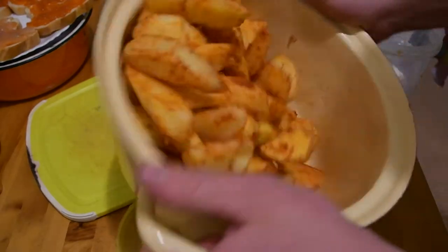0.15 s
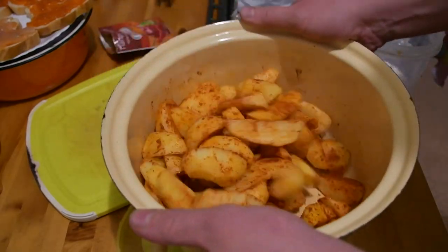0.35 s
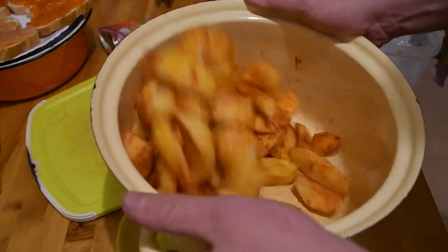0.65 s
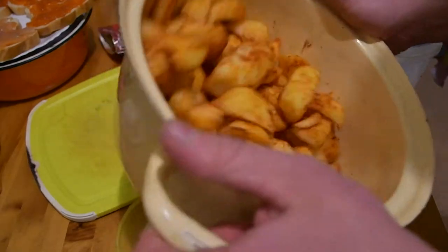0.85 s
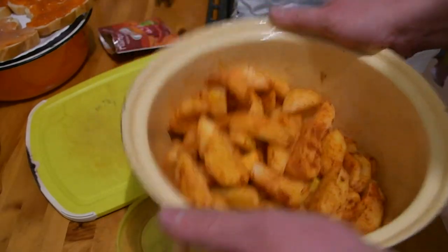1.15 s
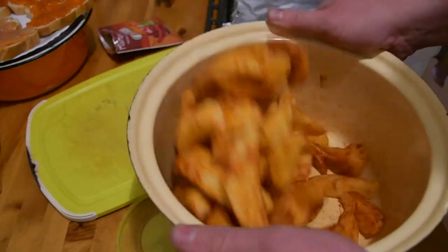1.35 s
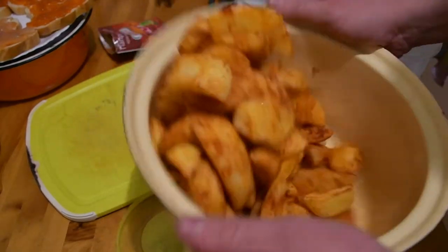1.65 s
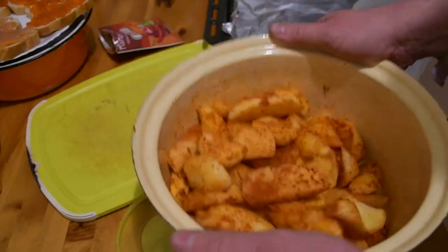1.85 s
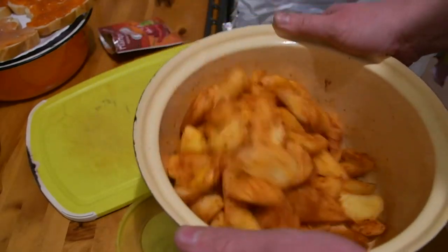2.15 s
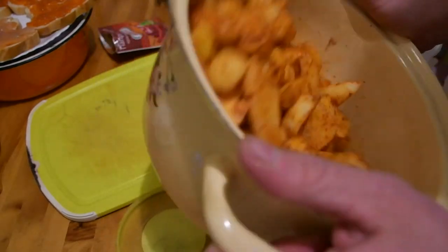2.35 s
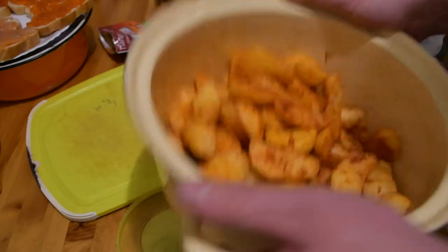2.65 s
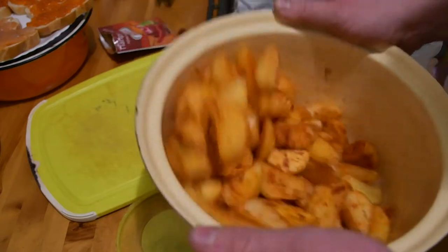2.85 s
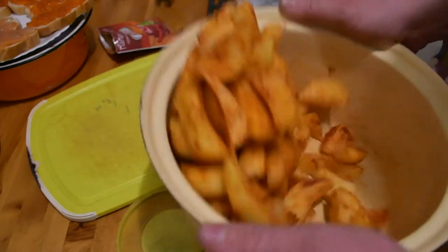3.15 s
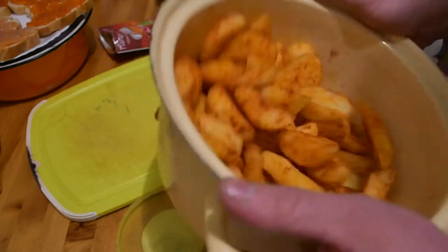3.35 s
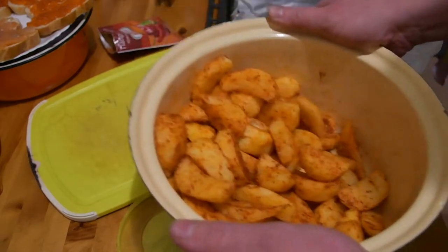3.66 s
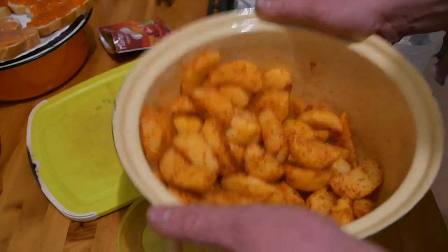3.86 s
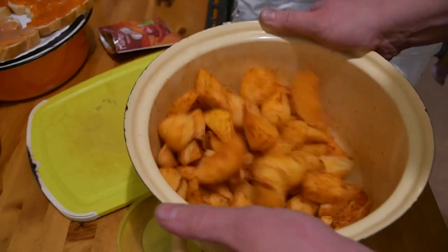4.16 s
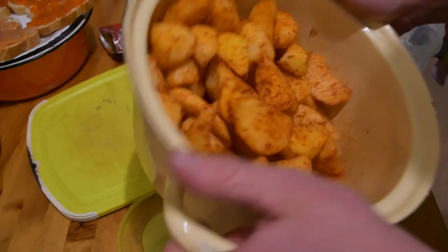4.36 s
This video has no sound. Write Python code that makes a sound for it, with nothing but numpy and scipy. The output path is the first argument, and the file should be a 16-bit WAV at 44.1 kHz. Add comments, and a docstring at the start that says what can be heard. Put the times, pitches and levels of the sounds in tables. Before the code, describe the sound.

A close stereo pickup in a still kitchen: a heap of wet wedges scrapes along the smooth pot wall, drops back with muffled clatter and short damped rings, then nearly hushes before the next toss. The rhythm is regular but hand-made, some landings much harder, with small slapping smacks, slight echo and quiet low air.

```python
"""In a quiet kitchen, oiled raw potato wedges are tossed in a glazed pot held in two hands, close to a stereo microphone.
Each toss: the heap slides hissing along the glaze, then wedges land and knock the hand-damped pot into short rings.
The hiss is shaped noise with crackles; landings, small bumps and rubbing shake a set of decaying modes.
Wet faces smack the glaze in bursts of noise. A faint echo of the kitchen and its still air lie around it all."""
import sys
import numpy as np
from scipy import signal
from scipy.io import wavfile
from scipy.ndimage import uniform_filter1d

SR = 44100
rng = np.random.default_rng(int(sys.argv[2]) if len(sys.argv) > 2 else 0)


def nominal_scale(level):
    """Amplitude ratio for a level in decibels (scalar or array-like)."""
    x = np.asarray(level, float) / 20
    return 10 ** x


def file_out(sig):
    """Save sig as 16-bit WAV at sys.argv[1]."""
    # one column per channel
    cols = np.atleast_2d(sig).T
    # limit, then scale
    lim = np.clip(cols, -1, 1)
    pcm = np.round(lim * 32767).astype(np.int16)
    wavfile.write(sys.argv[1], SR, pcm)


N = 198711  # length in samples

# Colour of noise made on the glaze: f/Hz, level/dB (per Hz, relative)
GLAZE_COLOUR = [(760, -52), (1300, -39), (1620, -10), (2000, -9.5), (2390, -8), (3910, -8), (5360, -8),
                (7730, -6), (10700, -6), (15900, -18)]


def evened(x):
    """Scales to rms 1."""
    return x / np.sqrt(np.mean(x ** 2) + 1e-20)


def read(points, hz):
    """Reads a table of values over frequency, with straight lines on a log-frequency axis."""
    f, value = np.transpose(points)
    return np.interp(np.log(hz + 1), np.log(f + 1), value)


def spread(mid, side, hz):
    """Left and right from the part both microphone ports share and the part they do not."""
    # how much louder the left port is than the right: f/Hz, level/dB
    left_over_right = [(60, 0.0), (150, 0.0), (380, -0.5), (950, -1.0), (2380, -3.5), (5980, -2.5),
                       (15000, -7.5)]
    # the unshared part against the shared one: f/Hz, level/dB
    side_share = [(60, -24.5), (150, -39), (380, -40), (950, -10.5), (2380, -0.5), (5980, -0.5),
                  (15000, -2.5)]
    half = nominal_scale(read(left_over_right, hz) / 2)
    side = side * nominal_scale(read(side_share, hz))
    return np.array([(mid + side) * half, (mid - side) / half])


def noise_pair(points, patchy_db, size):
    """Random short-time spectra for two microphone ports, alike in the bass, with drifting patches."""
    frames = 4 * N // size + 5
    hz = np.fft.rfftfreq(size, 1 / SR)[:, None]
    a, b, c, d, patches = rng.standard_normal((frames, len(hz), 5)).T
    patches = uniform_filter1d(patches, size=5, axis=0)  # smooth over frequency
    patches = evened(uniform_filter1d(patches, size=12, axis=1))  # smooth over time
    colour = nominal_scale(read(points, hz) + patchy_db * patches)
    spectra = spread(a + 1j * b, c + 1j * d, hz) * colour
    noise = signal.istft(spectra, nperseg=size, noverlap=3 * size // 4)[1]
    return evened(noise[:, :N])


def level(start, end, first_db, last_db, rise, fall):
    """Level in dB for every sample: each motion sets in steeply, runs from first to last, dies away; powers add."""
    t = np.arange(N)[:, None] / SR
    progress = np.clip((t - start) / np.maximum(end - start, 1e-3), 0, 1)
    db = first_db + (last_db - first_db) * progress
    db = db - rise * np.maximum(start - t, 0) - fall * np.maximum(t - end, 0)
    return 10 * np.log10((nominal_scale(db) ** 2).sum(1) + 1e-20)


def flicker(per_s, count=1):
    """Slow random wandering: new normal draws per_s times a second, joined by straight lines."""
    steps = rng.standard_normal((count, 1000))
    return [np.interp(np.arange(N) / SR * per_s, np.arange(1000), row) for row in steps]


def still_air():
    """The still air of the room: quiet, steady noise, strongest in the bass."""
    # colour of the air noise: f/Hz, level/dB (per Hz, relative)
    air_colour = [(24, -23), (40, -21), (255, -3), (478, -12), (629, -9), (1090, -16), (1800, -22.5),
                  (5160, -28), (15900, -38)]
    return nominal_scale(-49.5) * noise_pair(air_colour, 0.49, size=2048)


def sliding():
    """How fast the heap slides, in dB."""
    # strokes of the heap along the wall:
    # breaks loose t/s, hand stops pushing t/s, first level/dB, last level/dB
    strokes = [(0.0, -0.005, -18, -40), (0.109, 0.257, -37, -31), (0.4, 0.43, -38, -41),
               (0.524, 0.64, -36.5, -25.5), (0.857, 0.993, -31.5, -30), (1.236, 1.442, -33, -31),
               (1.584, 1.715, -36.5, -28.5), (1.987, 1.97, -27, -26.5), (2.082, 2.091, -27, -24),
               (2.356, 2.398, -34, -34.5), (2.456, 2.522, -28, -29.5), (2.719, 2.75, -40, -34.5),
               (2.807, 2.855, -34.5, -27.5), (3.067, 3.265, -36.5, -30.5), (3.393, 3.437, -43, -38),
               (3.478, 3.482, -22, -30.5), (3.827, 3.91, -52, -62), (3.927, 3.988, -41, -26),
               (4.017, 4.168, -32.5, -36.5), (4.342, 4.46, -44, -24), (4.447, 4.525, -47, -39)]
    loose_db_per_s, rest_db_per_s = 896, 133.5  # how fast a stroke breaks loose and comes to rest
    return level(*np.transpose(strokes), loose_db_per_s, rest_db_per_s)


def slide(grains_per_s=300, grain_db=9.0, grain_share=0.38, grain_s=0.0017, catch_db=3.0):
    """Oily hiss of the heap dragged over the glaze; it catches and slips, studded with sticky crackles."""
    grain_size = nominal_scale(grain_db * np.minimum(rng.exponential(1, N), 3))
    grains = (rng.random(N) < grains_per_s / SR) * grain_size
    # each grain dies away over grain_s
    crackle = evened(signal.lfilter([1], [1, -np.exp(-1 / (grain_s * SR))], grains))
    drag = nominal_scale(sliding() + catch_db * flicker(45)[0])
    drag = drag * (1 - grain_share + grain_share * crackle)
    return drag * noise_pair(GLAZE_COLOUR, 2.2, size=256)


def tumbling():
    """How hard the heap tumbles, in dB."""
    # the heap coming down, in one or more falls a toss, and small tumbles between:
    # first wedges fall t/s, bulk is down t/s, level then/dB, settling speed/(dB per s)
    tumbles = [(0.0, 0.007, -34, 238), (0.173, 0.233, -16.5, 177), (0.403, 0.409, -25, 252),
               (0.553, 0.647, -16, 131), (0.905, 0.976, -19.5, 176), (1.281, 1.346, -20, 113),
               (1.64, 1.676, -19.5, 179), (1.998, 1.99, -25, 129), (2.036, 2.052, -15.5, 116),
               (2.432, 2.503, -14, 159), (2.722, 2.763, -29.5, 150), (2.82, 2.85, -15, 209),
               (3.137, 3.215, -22, 110), (3.439, 3.453, -21, 137), (3.994, 4.018, -11.5, 154),
               (4.4, 4.418, -11, 76)]
    build_db, rise_db_per_s = 5.5, 445  # the first wedges are build_db quieter than the bulk
    start, down, db, settle = np.transpose(tumbles)
    return level(start, down, db - build_db, db, rise_db_per_s, settle)


def pot(place_db=4.0, bumps_per_s=220, bump_db=-13.0, spread_db=6.0, rub_db=-32.5, contact_s=0.00097, drift=0.01,
        mute_db=3.5, corner_db=-1.5, tip_s=0.003):
    """Landings, a rain of small bumps and the rub of the heap all shake the same modes."""
    # what the pot rings with: f/Hz, level/dB, time to fall by 60 dB t/s (held to 0.2 s at most below)
    modes = [(129, -24.5, 0.068), (174, -19, 0.058), (260.7, -13.5, 0.037), (316, -17.5, 0.12),
             (398, -14, 0.049), (556.8, -13, 0.096), (614, -8.5, 0.026), (648.5, -8, 0.028),
             (771, -6.5, 0.056), (753, -29.5, 0.19), (920, -20.5, 0.035), (998.5, -23, 0.21),
             (1045.7, -13, 0.11), (1105, -5, 0.061), (1127.5, -11.5, 0.072), (1626, -16.5, 0.1),
             (1667, -10, 0.043), (2215, -16.5, 0.061), (2405, -15, 0.048), (3042, -16, 0.026),
             (3425, -18.5, 0.056), (4150, -28.5, 0.088), (4530, -19.5, 0.038), (5400, -16, 0.024),
             (5820, -19, 0.023), (6130, -25, 0.036), (7600, -22, 0.035), (7160, -25.5, 0.045),
             (8730, -24.5, 0.023), (9400, -23.5, 0.019), (10240, -26, 0.015)]
    # wedges landing: t/s, force level/dB, extra level for low rings/dB, extra level for high rings/dB
    knocks = [(0.178, -21, -3, 3.5), (0.199, -11.5, -10, 1.5), (0.246, -18, 2.5, -1),
              (0.393, -21, -3.5, 3.5), (0.527, -43, -1, 11), (0.546, -25, -22, 1), (0.586, -9, 2.5, -2.5),
              (0.597, -13, 3.5, 2), (0.61, -6.5, -2, -1), (0.636, -1.5, -14.5, -11),
              (0.665, -23, -10, -16.5), (0.702, -13, 1.5, -10), (0.768, -23, -15, -6), (0.873, -39, 13, 6),
              (0.936, -16, 3, -8), (0.945, -15, -6, 2.5), (0.964, -18, -3, 4), (0.954, -15, -14, -4),
              (0.988, -15.5, 5, 3), (1.045, -38, 16.5, -17), (1.312, -11.5, 2, -4.5),
              (1.327, -19.5, -3, 0.5), (1.351, -23, 4, 2), (1.366, -16.5, 1, 0), (1.486, -26.5, 2.5, 8.5),
              (1.649, -37, 17.5, -5.5), (1.684, -17, -2, 2.5), (1.711, -27, 6, 1), (1.769, -35, -8, 16.5),
              (1.985, -29, -1, 5.5), (1.999, -23, -10, 9.5), (2.049, -8.5, -16, -8), (2.072, -7.5, 6, -11),
              (2.081, -3.5, -6.5, -9), (2.425, -26, -21, -6.5), (2.45, -17.5, 9, -6.5),
              (2.484, -17, 4, 7.5), (2.5, -10.5, 2, -3), (2.733, -34.5, 3, -2), (2.798, -30, 9.5, 11),
              (2.817, -26, 11, 7), (2.839, -16, 0.5, -25), (2.859, -12, -0.5, -4), (3.137, -35, 8, 4),
              (3.167, -10, -4.5, -2.5), (3.19, -25, 9.5, 5.5), (3.301, -35.5, 7, 12), (3.456, -16.5, 3, -9),
              (3.465, -16, 6.5, 4.5), (3.504, -12, -9.5, -6), (3.965, -17.5, 2.5, -17),
              (4.008, -26.5, 7, 3), (4.045, -19, 0, 5.5), (4.359, -34, 10.5, 9), (4.375, -8.5, -13, -5),
              (4.395, -2, -33, -8.5), (4.427, -5, 0.5, -10), (4.447, -9, 1, -3)]
    s, peak_db, low_db, hard_db = np.transpose(knocks)
    # where a wedge lands sets how much each mode gets
    place = rng.standard_normal((len(s), len(modes), 3))
    # a corner touches first, then the face about tip_s later
    corner_at = np.round(s * SR).astype(int)
    tip = tip_s * SR * rng.uniform(0.5997, 1.4, len(s))
    face_at = corner_at + np.round(tip).astype(int)

    bump_at = np.flatnonzero(rng.random(N) < bumps_per_s / SR)
    luck = np.minimum(rng.exponential(1, len(bump_at)), 2.5)
    bump_size = nominal_scale(tumbling()[bump_at] + bump_db + spread_db * luck)

    # the shifting load and grip detune the pot: drift is the rms share by which pitch wanders
    t = np.arange(N) / SR
    load = evened(sum(np.sin(2 * np.pi * (f * t + rng.random())) / np.sqrt(f) for f in np.geomspace(1, 15, num=12)))
    clock = np.cumsum(1 + drift * load) / SR

    # each mode has a twin turned around the round wall, which the two ports hear in opposite phase
    rub = nominal_scale(sliding() + rub_db) * rng.standard_normal((2, N))
    muting = flicker(14, count=len(modes))
    soft = np.exp(-1 / (contact_s * SR))  # flesh is soft: a push, not a spike
    out = np.zeros((2, N))
    for k, (hz, db, t60) in enumerate(modes):
        # rubbing favours high modes; wedges lying on the wall mute now one mode, now another
        force = rub * nominal_scale(8.0 * np.log2(hz / 1000) + mute_db * muting[k])
        dull_db = -4.0 * max(np.log2(hz / 2500), 0)  # soft blows hardly reach the top modes
        force[:, bump_at] += nominal_scale(dull_db) * bump_size * rng.standard_normal((2, len(bump_at)))

        colour_db = low_db if hz < 900 else np.clip(np.log2(hz / 1200) * 2.5, 0, 1) * hard_db
        colour_db = colour_db - 8.9 * (hz < 450)  # holds back the hollow thud of the whole pot
        blow = nominal_scale(peak_db + colour_db + dull_db + place_db * place[:, k, 0])
        blow = np.array([blow, blow * place[:, k, 1]])
        force[:, corner_at] += nominal_scale(corner_db) * blow
        force[:, face_at] += blow * np.sign(place[:, k, 2])

        # shift the force down to 0 Hz, let it ring there, then shift it back to the drifting pitch
        turn = np.exp(2j * np.pi * hz * clock)
        ring = nominal_scale(-60 / (np.clip(t60, .01, .2) * SR))
        swing = signal.lfilter([1 - soft], np.poly([soft, ring]), force * turn.conj())
        out += spread(*(nominal_scale(db) * (swing * turn).imag), hz)
    return out


def smacks(fast_s=0.0049, slow_s=0.02, core_db=-4.5, core_width=0.074, tick_db=6.0, tick_s=0.00043):
    """Each smack is a tick, a short wide puff and a longer, narrower hiss where the oil film tears."""
    # wet faces slapping the glaze or peeling off it: t/s, level/dB, f/Hz (middle of the narrow hiss)
    wet_faces = [(0.3936, -28, 8700), (0.4334, -52, 5820), (0.609, -30, 6200), (0.665, -34, 8500),
                 (1.4134, -50, 5180), (1.4224, -18, 8000), (1.5648, -36.5, 5600), (2.0493, -28.5, 4470),
                 (2.107, -27, 5810), (2.247, -44, 7000), (2.26, -36, 7800), (2.4523, -30.5, 5600),
                 (2.6684, -36.5, 5780), (3.029, -40.5, 5640), (3.164, -28.5, 8450), (3.3034, -30.5, 6800),
                 (3.469, -23.5, 7550), (4.242, -39, 4440), (4.428, -25, 7000), (4.4516, -24.5, 8800)]
    t = np.arange(SR // 10) / SR
    out = np.zeros((2, N + SR))
    puff = noise_pair(GLAZE_COLOUR, 1.9, size=256)
    for s, db, hz in wet_faces:
        at = round(s * SR)
        part = puff[:, at:at + len(t)]
        u = t[:part.shape[1]]
        band = signal.butter(1, [hz * (1 - core_width), hz * (1 + core_width)], "bandpass", fs=SR)
        core = nominal_scale(core_db) * evened(signal.lfilter(*band, part))
        wide = part * (np.exp(-u / fast_s) + nominal_scale(tick_db) * np.exp(-u / tick_s))
        out[:, at:at + len(u)] += nominal_scale(db) * (wide + core * np.exp(-u / slow_s))
    return out[:, :N]


def kitchen(x):
    """Echo from sparse taps of random sign, each band dying at its own speed, other taps for each side."""
    # how long the echo lasts: f/Hz, time to fall by 60 dB t/s
    echo_times = [(200, 0.34), (1000, 0.35), (4000, 0.15), (12000, 0.055)]
    taps = np.zeros((2, SR // 2))
    at = np.arange(200, SR // 2 - 20, 20)
    at = at + rng.integers(0, 20, (2, len(at)))  # one tap somewhere in every 20 samples
    np.put_along_axis(taps, at, rng.choice([-1., 1.], at.shape), 1)
    hz, t, z = signal.stft(taps, SR, nperseg=256)
    decay = nominal_scale(-60 * t / np.maximum(read(echo_times, hz), .05)[:, None])
    z = spread(*z, hz[:, None]) * decay
    tail = signal.istft(z, SR, nperseg=256)[1]
    tail = tail / np.linalg.norm(tail[1])
    return signal.fftconvolve(x.mean(0)[None], tail, axes=1)[:, :N]


def scene():
    """The pot and its load, their echo in the kitchen, and the still air of the room."""
    near = slide() + pot() + smacks()
    return near + nominal_scale(-10) * kitchen(near) + still_air()


def low_pass(x):
    """Removes everything above the highest recorded frequency."""
    return signal.sosfilt(signal.butter(12, 16090, fs=SR, output="sos"), x)


def record(dry, bass_hz=85, edge_hz=15780):
    """The microphone drops the deep bass, its left port hears one sample late, peaks stop at full scale."""
    thin = signal.lfilter(*signal.butter(N=3, Wn=bass_hz, btype="highpass", fs=SR), dry)
    left_late = np.append(0, thin[0, :-1])
    limited = np.clip([left_late, thin[1]], -1, 1)
    edge = signal.firwin(numtaps=401, cutoff=edge_hz, fs=SR)  # the treble ends here
    mix = signal.oaconvolve(limited, edge[None], "same")
    return low_pass(mix)


dry = scene()
out = record(dry)
file_out(out)
```